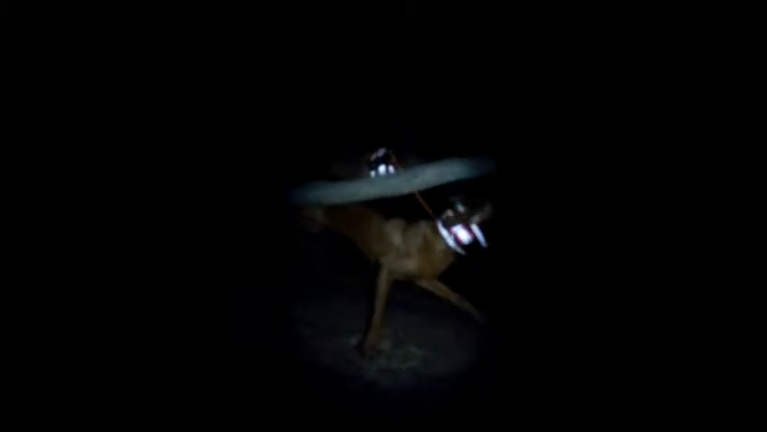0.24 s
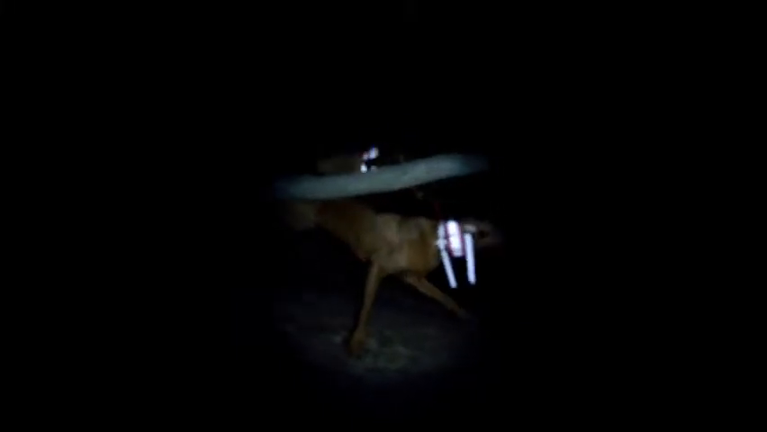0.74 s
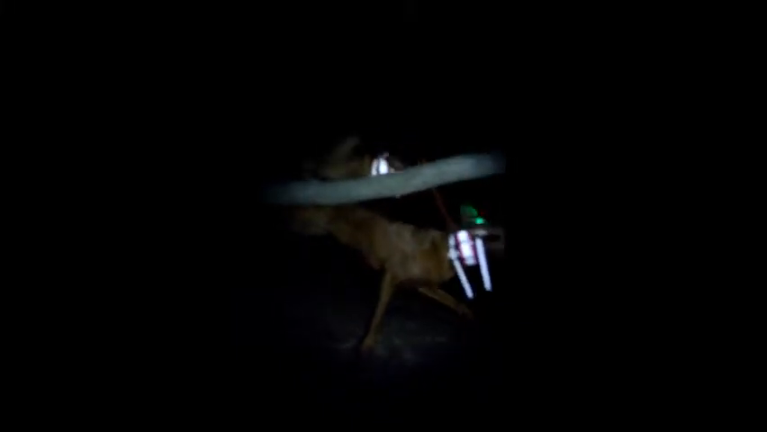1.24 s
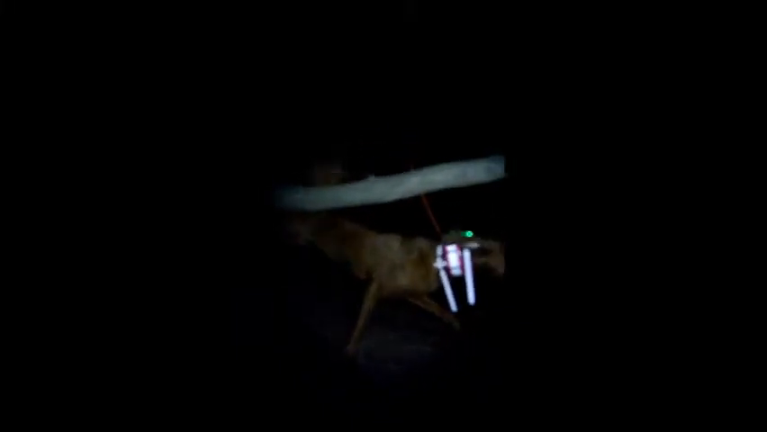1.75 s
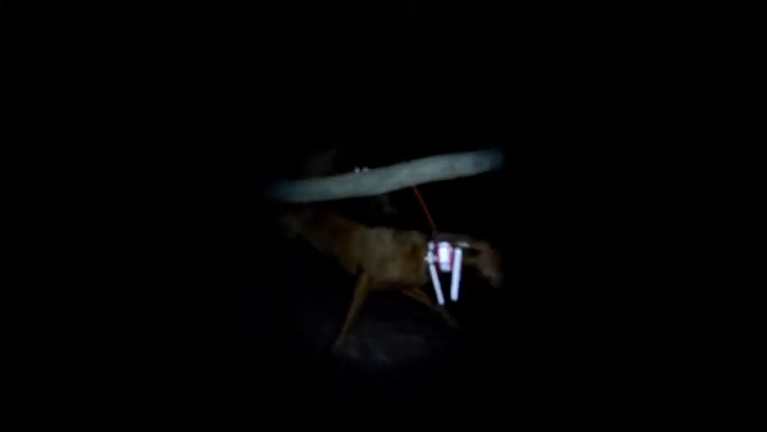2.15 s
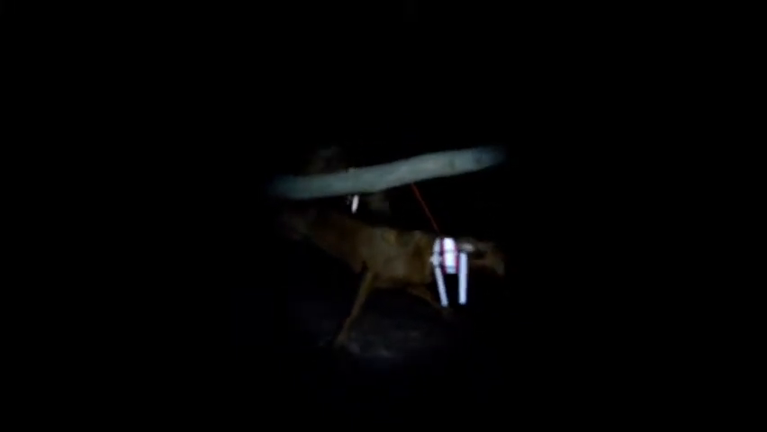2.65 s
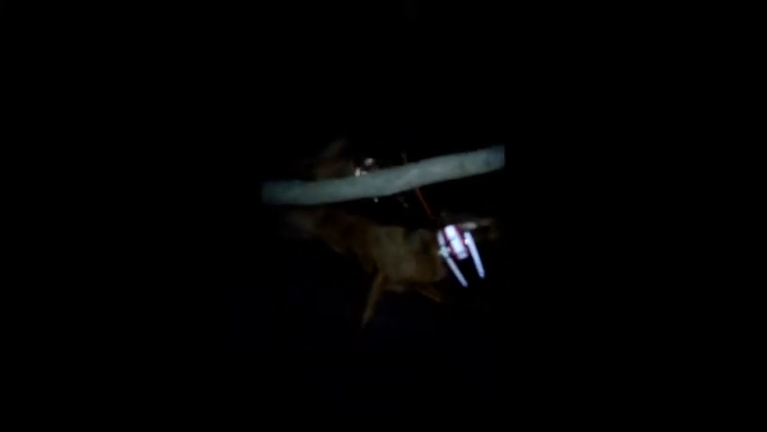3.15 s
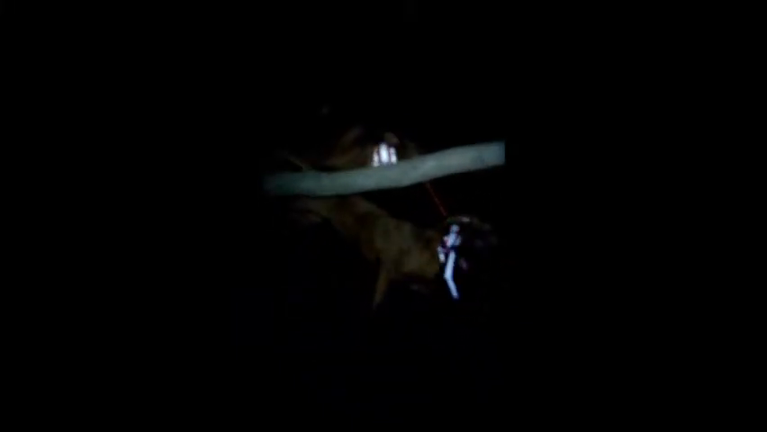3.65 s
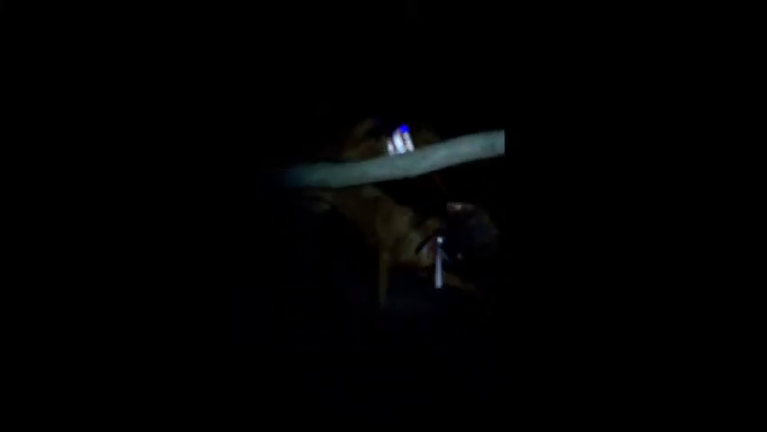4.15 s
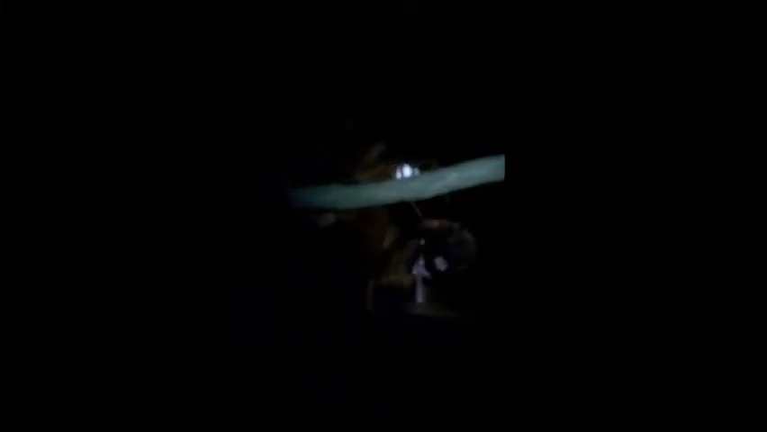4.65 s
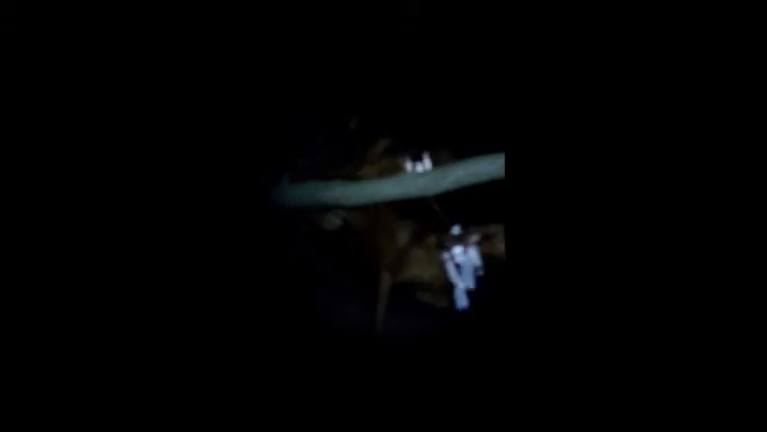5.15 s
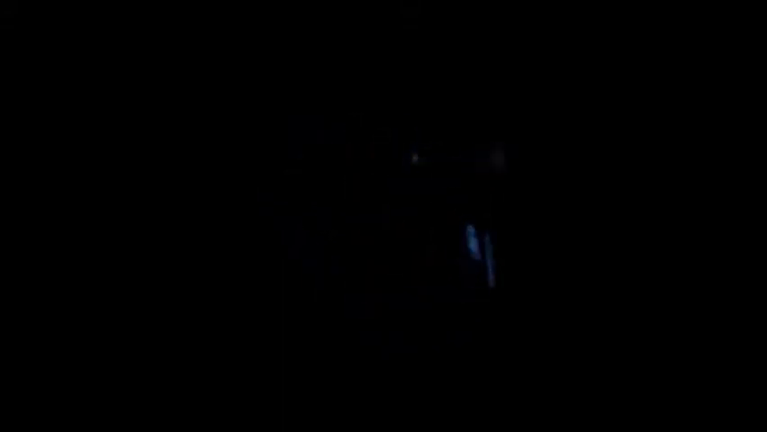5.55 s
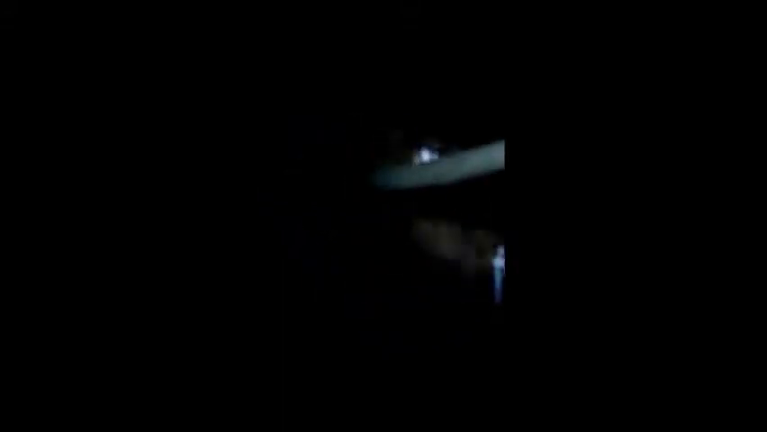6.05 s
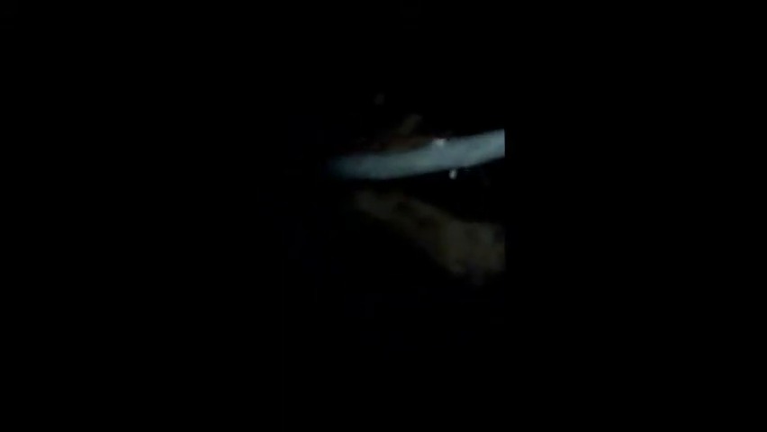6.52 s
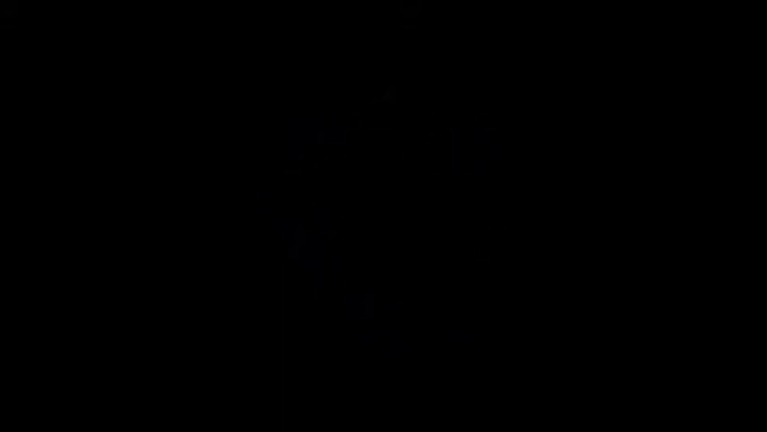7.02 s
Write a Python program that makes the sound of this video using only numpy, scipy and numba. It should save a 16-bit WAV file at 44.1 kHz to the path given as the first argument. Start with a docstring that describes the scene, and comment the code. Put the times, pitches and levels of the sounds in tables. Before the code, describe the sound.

Two hounds, one sharp and one lower, bark steadily in turn at the foot of a tree, echoing through night woods with faint leaf rustle.

```python
"""A faint woodland wash and leaf rustle open the night, then a sharp hound barks and a lower one answers.
They keep barking at the foot of a tree, mostly in turn, twice together: fold pulses ring mouth and throat.
Each bark starts as a clear rising note, breaks into rough, irregular fold cycles and falls away.
The trunks return a decaying noise wash; noise bands make paws in leaves, gasps and air on the microphone."""
import sys
import numpy as np
from scipy import signal
from scipy.io import wavfile
from scipy.ndimage import uniform_filter1d
from numba import njit

SR = 44100
rng = np.random.default_rng(int(sys.argv[2]) if len(sys.argv) > 2 else 0)


def persist_wave(psi):
    """Save psi, clipped to +-1, as 16-bit WAV."""
    counts = np.round(np.clip(psi, -1, 1) * 32767).astype(np.int16)
    wavfile.write(sys.argv[1], SR, np.atleast_2d(counts).T)


def ratio_of_db(decibels):
    """Turn decibels (scalar or array-like) into linear amplitude factors; 0 dB maps to 1."""
    return 10 ** (np.asarray(decibels, float) / 20)


N = 321048


def in_time(tables):
    """Joins the control points of all tables by straight lines, one curve per column."""
    s, *columns = np.transpose(np.concatenate(tables))
    return [np.interp(np.arange(N) / SR, s, c) for c in columns]


def band(x, low_hz, high_hz):
    """Band-pass, rms 1."""
    sos = signal.butter(2, [low_hz, high_hz], "band", fs=SR, output="sos")
    y = signal.sosfilt(sos, x)
    return y / np.sqrt(np.mean(y ** 2))


def swells(rows):
    """Sum of bell-shaped gains, one for each (centre_s, length_s, level_db)."""
    t = np.arange(N) / SR
    return sum(ratio_of_db(db) * np.exp(-(2 * (t - s) / length) ** 2) for s, length, db in rows)


@njit
def resonate(x, hz, width, sr):
    """Two-pole resonance with a moving centre, gain 1 on top."""
    y, r = np.zeros(len(x)), np.exp(-np.pi * width / sr)
    for i in range(2, len(x)):
        drive = (1 - r * r) / 2 * (x[i] - x[i - 2])
        y[i] = drive + 2 * r * np.cos(2 * np.pi * hz[i] / sr) * y[i - 1] - r * r * y[i - 2]
    return y


# air on the microphone, level before the lumps: centre_s, length_s, level_db
PUFFS = [(1.0, 0.088, -43), (1.19, 0.068, -38), (5.1, 0.076, -41.5)]


def puffs(dogs):
    """Lumpy low noise; every bark also pushes a little air, following its loudness."""
    push = ratio_of_db(-43) * np.sqrt(uniform_filter1d(dogs ** 2, size=900) + 1e-14)
    lumps = ratio_of_db(4.0 * band(rng.standard_normal(N), 10, 30))
    noise = rng.standard_normal(N)
    gusts = swells(PUFFS) * band(noise, 25, 120)
    pushed_air = (push + ratio_of_db(-75)) * band(noise, 31, 240)
    return lumps * (gusts + pushed_air)


# breaths between barks, level before the throat colours them: centre_s, length_s, level_db
GASPS = [(.625, 0.055, -61), (3.11, 0.034, -65), (3.73, 0.052, -67), (4.66, 0.15, -65), (4.97, 0.23, -79.5)]


def gasps():
    """Air drawn in through a narrow throat: three bands of one hiss."""
    noise = rng.standard_normal(N)
    throat = band(noise, 1570, 2100) + 0.27 * band(noise, 3040, 3170) + 2.0 * band(noise, 580, 1550)
    return swells(GASPS) * throat


# paws in leaves: time_s, level_db
RUSTLE = [(0, -69), (.58, -73), (.7, -95.5), (1.25, -68), (1.9, -80), (2.45, -70.5), (3.0, -69.5),
          (3.65, -77), (3.8, -80.5), (4.5, -63), (4.75, -74), (4.9, -69), (5.5, -75), (6.1, -68.5),
          (6.5, -80.5), (7.28, -73)]
# twig ticks, noise level at the onset: start_s, level_db
TICKS = [(3.292, -49), (3.3264, -65), (4.4034, -50)]


def leaves():
    """Dense rustle of noise in flickering grains, with lone twig ticks dying within 60 samples."""
    grains = rng.standard_normal(N) * ratio_of_db(1.8 * band(rng.standard_normal(N), 10, 200))
    clicks = np.zeros(N)
    for s, db in TICKS:
        tick = rng.standard_normal(60) * np.exp(-np.arange(60) / 18)
        clicks[round(s * SR):][:60] += ratio_of_db(db) * tick
    return ratio_of_db(in_time([RUSTLE])[0]) * band(grains, 400, 11000) + clicks


WOOD_T60_S, NEAR_T60_S, WOOD_DB = 1.61, .5, -31.5


def wood(x):
    """Scatter from near trunks dies fast, from far ones slowly and dull."""
    t = np.arange(2 * SR) / SR
    lead = int(.62 * SR)   # an earlier pair of barks still hangs in the air
    noise = rng.standard_normal(N)
    near = 8.0 * band(noise, 470, 3600)[:len(t)] * ratio_of_db(-60 * t / NEAR_T60_S)
    far_noise = (band(noise, 270, 1000) + 1.2 * band(noise, 600, 2200))[:len(t)]
    far = far_noise * ratio_of_db(-60 * t / WOOD_T60_S)
    tail = (near + far) * (t > .02)
    tail = tail / np.sqrt(np.sum(tail ** 2))
    wash = signal.fftconvolve(np.r_[x[:lead], x], tail)
    return ratio_of_db(WOOD_DB) * wash[lead:lead + N]


# a side pocket of the throat swallows part of this band
NOTCH_HZ, NOTCH_WIDTH_HZ, NOTCH_DEPTH = 3610., 1100., 0.4
CLEAR_AIR = .12   # share of turbulence in a clear note


def cavity(source, hz, width, rough):
    """A steep double resonance whose strength flickers as the soft walls shake."""
    shake = ratio_of_db((3.0 + 0.39 * rough) * band(rng.standard_normal(N), 9.8, 45))
    once = resonate(source, hz, width, SR)
    return shake * resonate(once, hz, width, SR)


def voice(barks, throat, rate, level_db, rough, mouth, alternate, mouth_width_hz, second_db, air_db,
          opening):
    """Fold pulses, unsteady in period and strength when rough, through mouth and throat."""
    rough = np.clip(1.5 * rough - .12, 0, 1)   # the voice breaks abruptly
    wobble, flutter = (band(rng.standard_normal(N), 20, 200) for _ in range(2))
    unsteady_rate = rate * np.exp((.004 + .18 * rough) * wobble)
    phase = 2 * np.pi * np.cumsum(unsteady_rate) / SR

    # soft, shut pulses are round
    softness = ratio_of_db(0.65 * np.minimum(level_db + 25, 0))
    shutness = np.minimum(mouth / 580, 1) ** 2.2
    sharp = np.exp(-rate / (3200 * softness * shutness))
    pulses = (1 - sharp ** 2) / (1 - 2 * sharp * np.cos(phase) + sharp ** 2)
    every_other = 1 + np.clip(alternate, 0, 1) * np.cos(phase / 2)
    strength = every_other * (1 + 0.2 * rough * np.tanh(flutter))

    air = ratio_of_db(air_db) * (CLEAR_AIR + rough) * rng.standard_normal(N)   # turbulence between the folds
    source = (pulses - 1) * strength + air
    breathy = 0.39 * source + air   # the far cavities hear mostly turbulence
    effort = ratio_of_db(0.31 * (level_db - 8.0)) * (mouth / 700) ** opening   # harder, wider barks are brighter

    out = cavity(source, mouth, mouth_width_hz, rough)
    out = out - ratio_of_db(second_db) * cavity(source, 2 * mouth, 0.72 * mouth_width_hz, rough)
    slide = np.exp(0.082 * band(rng.standard_normal(N), 2.0, 15.0))   # tongue and larynx keep moving
    for k, (hz, width, db) in enumerate(throat):
        lift = effort if hz > 1000 else 1
        feed = breathy if hz > 2900 else source
        out = out + (-1) ** k * ratio_of_db(db) * lift * cavity(feed, hz * slide, width, rough)
    through_wall = ratio_of_db(-18) * resonate(source, rate, 330.0, SR)   # sound through the throat wall
    hiss = ratio_of_db(-51.5) * air
    out = out + through_wall + hiss
    out = out - NOTCH_DEPTH * resonate(out, np.full(N, NOTCH_HZ), NOTCH_WIDTH_HZ, SR)

    # even out the loudness, then give it the level curve
    out = out / np.sqrt(uniform_filter1d(out ** 2, size=600) + 1e-12)
    t = np.arange(N) / SR
    sounding = sum((t >= b[0][0]) & (t <= b[-1][0]) for b in barks) > 0
    return out * ratio_of_db(level_db) * uniform_filter1d(sounding * 1., size=150)


# low dog's barks: top_s, top_hz, top_level_db, rise_s, bay_length_s, bay_level_db, bay_roughness (0-1),
# bay_mouth_hz
LOW_BARKS = [(0.377, 410.2, -15.5, .11, 0.12, -24, .5, 601),
             (0.993, 389.2, -17, 0.13, .115, -24.5, .4, 603),
             (1.607, 353.9, -25.5, 0.075, .115, -27, 0.2, 520),
             (2.195, 392.4, -27.5, 0.061, .115, -24, .06, 506),
             (2.837, 392.4, -20, .09, 0.1, -27, 0.53, 605), (3.465, 380.2, -18, 0.11, 0.098, -26, .55, 551),
             (4.125, 397.4, -16, .145, .1, -22, 0.6, 535), (5.124, 361.1, -21, .08, .1, -22.5, 0.4, 550),
             (5.805, 400, -15.5, 0.11, .1, -25.5, 0.47, 560),
             (6.841, 416.2, -14, .11, 0.092, -23.5, 0.45, 550)]
# its clear note rises in an S: share of the rise time still to go, share of the climb, level_db over the top's
BAY_RISE = [(0.96, 0, -34.5), (.8, 0.022, -12), (.55, .3, -7), (.3, .78, -4.5), (0.021, 0.94, -0.5),
            (0.081, 0.98, 2)]
# it slips up into the bay, which swells twice and sags: share of the bay's length, fold_rate_hz,
# level_db over the bay's, share of its roughness, share of its mouth_hz
BAY = [(0, 455, 1, .7, 1.0), (0.149, 460.1, 5, 0.78, .99), (0.419, 447.9, -3, 1.26, 1.01),
       (.72, 428.6, 3, .9, 1.01), (1.0, 412.4, -1, .6, .99)]
BAY_START_HZ, BAY_MOUTH_OVER_NOTE, CLEAR_ROUGH = 281.7, 2.206, 0.034
CATCH_S, CATCH_DB = .008, -2   # the note catches at once, at least this far under the bay
SLIP_HZ_PER_S = 2300
# the fall is shorter after a rough bay
BAY_FALL_S, FALL_CUT_S_PER_ROUGH, FALL_HZ_PER_S, FALL_DB, SHUT_MOUTH_HZ = .105, 0.074, 3300, -31, 324


def low_barks():
    """Control points (time_s, pitch_hz, level_db, roughness, mouth_hz) of each bark: rise, bay, fall."""
    barks = []
    for s, top_hz, top_db, rise_s, length, bay_db, rough, mouth_hz in LOW_BARKS:
        bark = []
        for left, share, db in BAY_RISE:
            hz = BAY_START_HZ + share * (top_hz - BAY_START_HZ)
            bark.append((s - left * rise_s, hz, top_db + db, CLEAR_ROUGH, BAY_MOUTH_OVER_NOTE * hz))
        catch_db = min(top_db, bay_db + CATCH_DB)
        bark.append((s + CATCH_S, top_hz, catch_db, rough / 2, bark[-1][4]))
        start = s + (BAY[0][1] - top_hz) / SLIP_HZ_PER_S
        for part, hz, db, share, wide in BAY:
            bark.append((start + part * length, hz, bay_db + db, share * rough, wide * mouth_hz))
        fall = BAY_FALL_S - FALL_CUT_S_PER_ROUGH * rough
        end_hz = max(BAY[-1][1] - FALL_HZ_PER_S * fall, 90)
        bark.append((start + length + fall, end_hz, bay_db + FALL_DB, 0, SHUT_MOUTH_HZ))
        barks.append(bark)
    return barks


# low dog's throat resonances, width of each of two passes: centre_hz, width_hz, level_db
LOW_THROAT = [(475, 130, -12), (1844, 360, -8), (2815, 240, -21.5), (4730, 310, -24.5), (5370, 590, -23.5)]


def low_dog():
    """Cycles alternate, adding half lines, when about 1.4 times the fold rate nears the mouth resonance."""
    barks = low_barks()
    rate, level_db, rough, mouth = in_time(barks)
    alternate = 1.02 * np.exp(-((mouth / rate - 1.4) / 0.33) ** 2)
    return voice(barks, LOW_THROAT, rate, level_db, rough, mouth, alternate, mouth_width_hz=250.0,
                 second_db=-3.0, air_db=18.5, opening=2.5)


# sharp dog's barks: top_s, top_hz, top_level_db, hoarseness (0-1), rasp_length_s, rasp_level_db,
# rasp_mouth_hz
SHARP_BARKS = [(0.197, 681.4, -17.5, 0.1, .068, -17, 768), (0.795, 679, -14.5, 0.32, .07, -19, 820),
               (1.394, 646, -13, 0.05, .075, -15, 893), (2.024, 680, -12, 0.06, .072, -16.5, 965.5),
               (2.639, 678, -13.5, 0.06, .078, -16.5, 930), (4.125, 1006, -8.5, 0, .093, -18, 950),
               (5.126, 700, -13.5, 0.3, .025, -10.5, 931), (5.675, 670, -18, .25, .06, -18, 876.2),
               (6.254, 983, -16.5, 0.06, .098, -23.5, 817), (6.623, 627.8, -18, 0.05, .07, -20, 895),
               (7.215, 656.7, -19.5, 0.08, .07, -17, 932)]
# its clear note climbs and thins just past the top: lead_s before the top at the usual pitch,
# share of the climb, level_db over the top's, roughness (0-1)
YELP_RISE = [(.048, 0.056, -38.5, 0.04), (.033, .4, -21, 0.06), (.018, .78, -7, 0), (.006, .95, -1, 0.05),
             (-.004, 1.04, 2.5, .06), (-.011, 1.1, -3.5, .3)]
# then it rasps, chokes and falls: fold_rate_hz, level_db over the rasp's, roughness (0-1), share of rasp_mouth_hz
RASP = [(520, 0, .8, 0.97), (455, -8, .5, .92), (400, -14, .35, 0.74), (190.9, -33, 0.07, 0.65)]
# a faint whimper between two barks: time_s, fold_rate_hz, level_db, roughness (0-1), mouth_hz
WHIMPER = [(6.417, 204.8, -41, 0.09, 206), (6.49, 180.6, -55.5, 0, 190.2), (6.511, 288.7, -54.5, 0, 613),
           (6.57, 405, -48, 0, 580)]
YELP_START_HZ, YELP_USUAL_HZ, YELP_SLOWING, YELP_MOUTH_OVER_NOTE = 520, 670, .6, 1.093
BREAK_S, CHOKE_S, YELP_FALL_S = .03, .014, .05   # the break is this long at the usual pitch


def sharp_barks():
    """Control points (time_s, pitch_hz, level_db, roughness, mouth_hz) of each call; high ones take longer."""
    calls = [np.array(WHIMPER)]
    for s, top_hz, top_db, hoarse, length, rasp_db, mouth_hz in SHARP_BARKS:
        slow = (top_hz / YELP_USUAL_HZ) ** YELP_SLOWING
        call = []
        for lead, share, db, rough in YELP_RISE:
            hz = YELP_START_HZ + share * (top_hz - YELP_START_HZ)
            call.append((s - lead * slow, hz, top_db + db, rough + share * hoarse,
                         YELP_MOUTH_OVER_NOTE * hz))
        times = s + np.cumsum([BREAK_S * slow, length, CHOKE_S, YELP_FALL_S])
        for t, (hz, db, rough, share) in zip(times, RASP):
            call.append((t, hz, rasp_db + db, rough, share * mouth_hz))
        calls.append(np.array(call))
    calls.sort(key=lambda call: call[0, 0])
    # the next call cuts a fall short
    cut = [np.c_[np.minimum(call[:, 0], after[0, 0]), call[:, 1:]] for call, after in zip(calls, calls[1:])]
    return cut + calls[-1:]


# sharp dog's throat resonances, width of each of two passes: centre_hz, width_hz, level_db
SHARP_THROAT = [(517, 150, -11), (1605, 350, -8.5), (2050, 570, -9.5), (2628, 560, -17), (4490, 540, -25.5),
                (5827, 2400, -35), (7230, 1000, -34.5)]


def sharp_dog():
    """Cycles alternate only when the voice is rough; high notes ring the second mouth resonance harder."""
    barks = sharp_barks()
    rate, level_db, rough, mouth = in_time(barks)
    second_db = -17.5 + 23 * np.maximum(rate / YELP_USUAL_HZ - 1, 0)
    return voice(barks, SHARP_THROAT, rate, level_db, rough, mouth, 0.22 * rough, mouth_width_hz=300.0,
                 second_db=second_db, air_db=8.5, opening=0.46)


def scene():
    """Both dogs, the wood's answer, leaves, gasps and puffs, in one channel."""
    dogs = sharp_dog() + low_dog()
    return (dogs + wood(dogs) + leaves() + gasps() + puffs(dogs))[None]


def top_cut(x):
    """Nothing passes above the cut-off."""
    return signal.sosfilt(signal.butter(12, 15760, fs=SR, output="sos"), x)


def record(dry):
    """The loudest peaks are softly rounded."""
    mix = np.tanh(dry)
    return top_cut(mix)


dry = scene()
out = record(dry)
persist_wave(out)
```